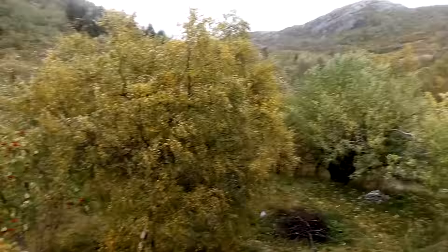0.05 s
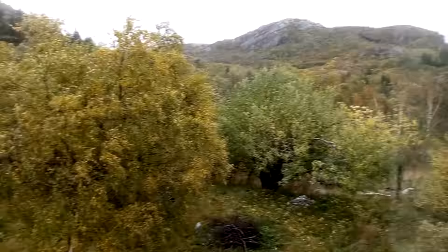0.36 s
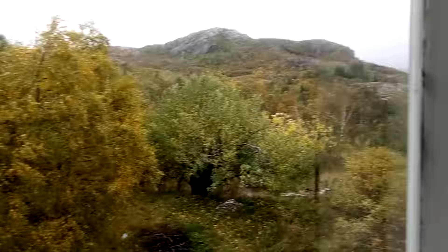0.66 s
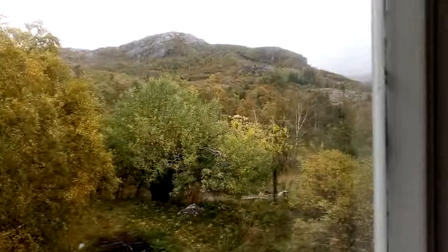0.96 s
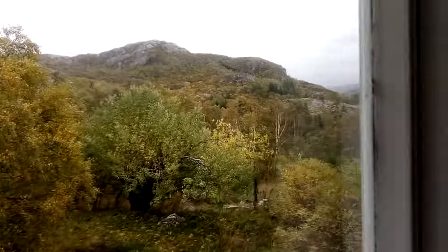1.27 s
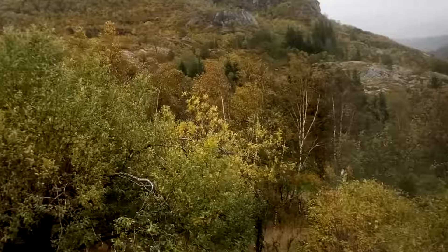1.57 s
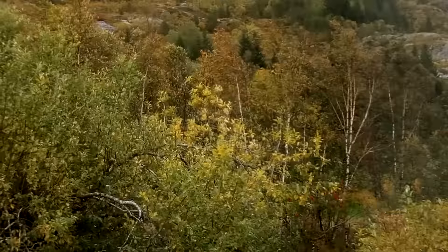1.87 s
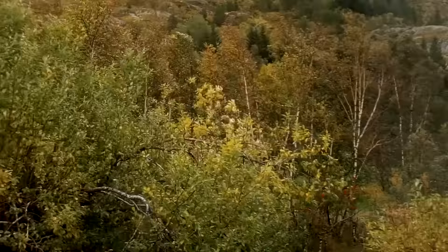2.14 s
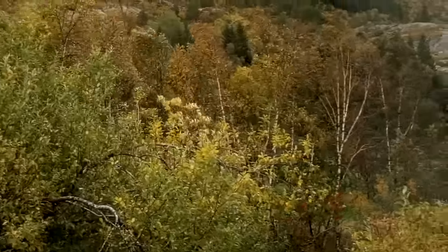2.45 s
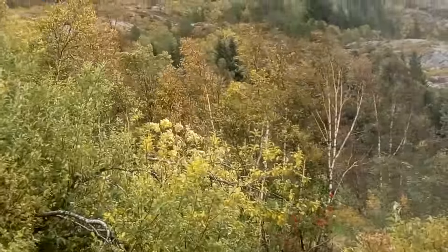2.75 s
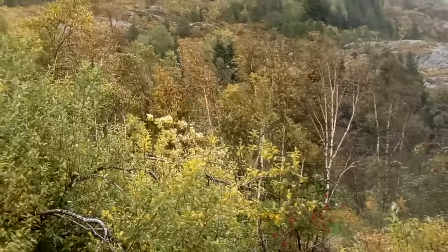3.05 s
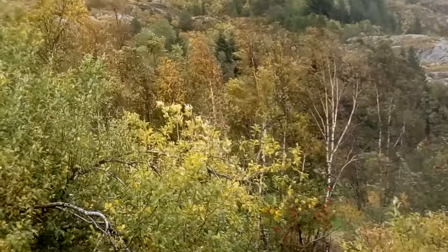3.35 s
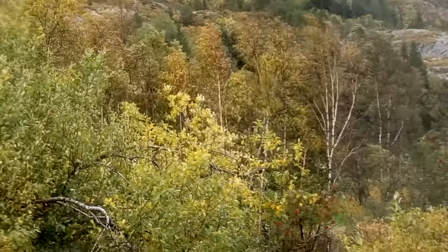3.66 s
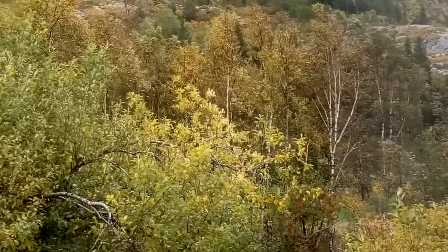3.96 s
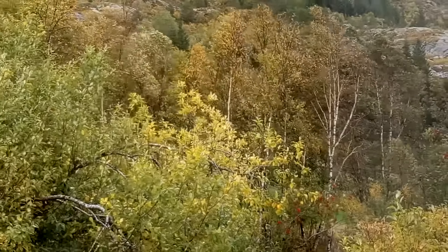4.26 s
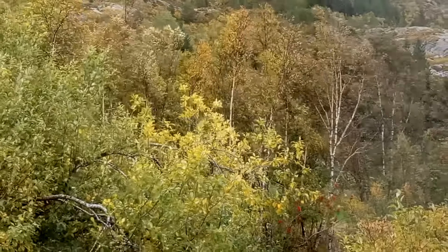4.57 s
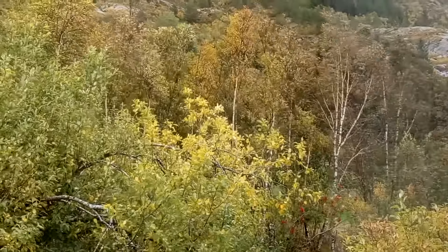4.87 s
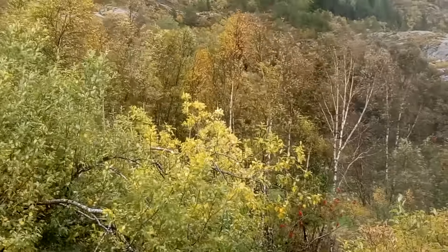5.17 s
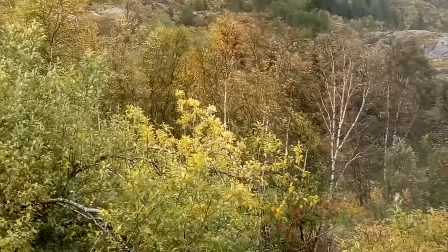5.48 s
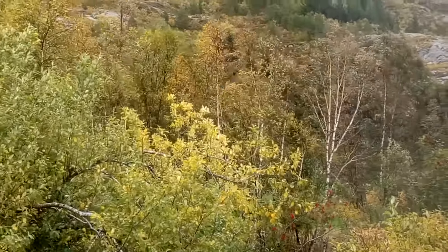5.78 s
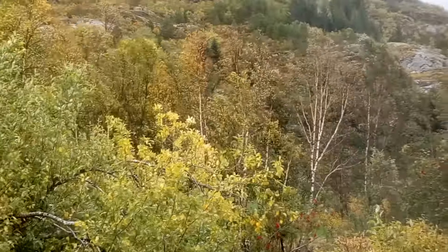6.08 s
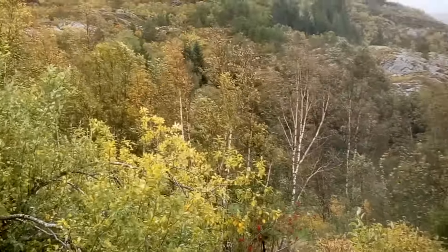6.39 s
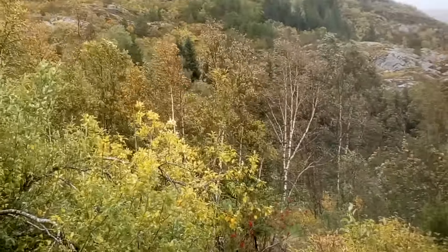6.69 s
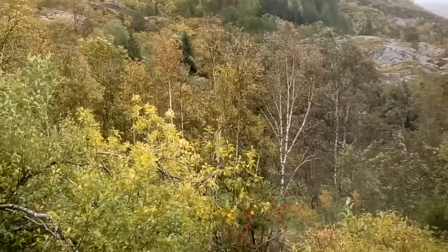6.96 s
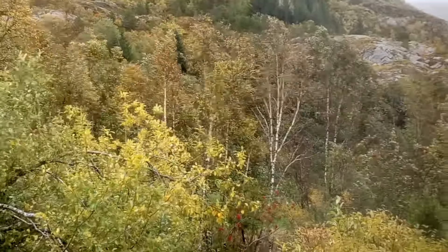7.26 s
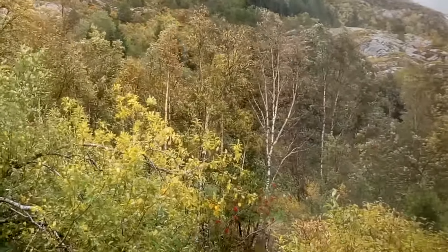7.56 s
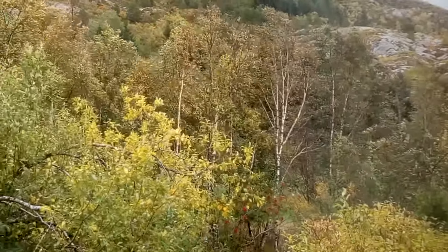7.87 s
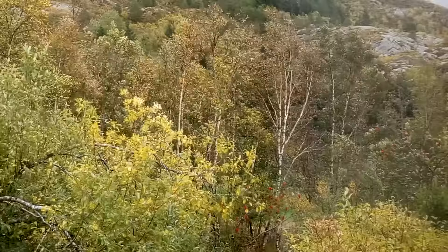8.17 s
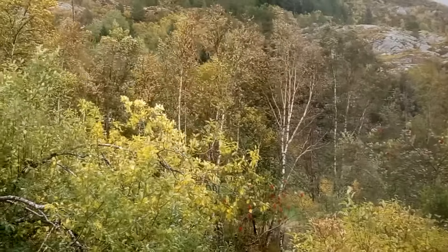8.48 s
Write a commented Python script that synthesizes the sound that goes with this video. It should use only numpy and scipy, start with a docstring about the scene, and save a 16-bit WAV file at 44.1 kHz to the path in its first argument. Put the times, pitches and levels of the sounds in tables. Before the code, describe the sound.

Two sharp knocks on a hand-held camera in a quiet room, over a faint motor hum, low rumble and hiss.

```python
"""Two knocks on a hand-held camera in a quiet room: a light touch, a hard blow and soft bumps push
its case, and the microphones' low cut turns each push into a thump that the room answers faintly.
A brief low pulse lies under the first knock; the hand rubs and brushes the case. Behind this a small
motor hums over low room rumble; the electronics hiss, with ticks and thin whines mostly on the left."""
import sys
import numpy as np
from scipy import signal
from scipy.fft import rfft, irfft, next_fast_len
from scipy.io import wavfile
from scipy.ndimage import uniform_filter1d

SR = 44100
rng = np.random.default_rng(int(sys.argv[2]) if len(sys.argv) > 2 else 0)


def pcm_store(signal):
    """Save signal as 16-bit PCM."""
    levels = np.round(np.clip(np.atleast_2d(signal), -1, 1) * 32767)
    wavfile.write(sys.argv[1], SR, levels.astype(np.int16).T)


N = 376173

# hard blows on the case: start_s, force_db, contact_ms
KNOCKS = [(1.1226, 0.2, 0.66), (7.6868, -3, 0.75)]
# soft bumps as the camera settles in the hand: start_s, force_db, contact_ms
BUMPS = [(1.2633, -29, 0.65), (1.55, -47, 2.2), (7.667, -38, 1.1), (7.7548, -29.5, 0.72),
         (7.8087, -45, 0.45), (7.853, -36.5, 0.82)]
# spectrum of the plastic's click: frequency_hz, gain_db
CLICK_SPECTRUM = [(500, -10), (1500, -3), (3000, 2), (6500, -4), (8500, -17.5), (12000, -26.5),
                  (16000, -32.5)]
def knocks(t, low_cut_hz=90, touch_lead_s=.00255, click_db=-26.5, click_growth=1.27):
    """Impact excitation: the microphones' steep low cut swings each force pulse into a short thump."""
    force = sum(push(t, start_s, db, contact_ms, pan_db=-3.5) for start_s, db, contact_ms in BUMPS)
    contacts = []
    for blow_s, db, contact_ms in KNOCKS:
        touch, blow = (blow_s - touch_lead_s, db - 14, -3), (blow_s, db, -.8)
        for start_s, force_db, pan_db in (touch, blow):
            force = force + push(t, start_s, force_db, contact_ms, pan_db)
            mid_rise_s = start_s + contact_ms / 2000  # hard plastic clicks while the force rises
            contacts.append((mid_rise_s, click_db + click_growth * force_db))
    left, right = signal.sosfilt(signal.butter(4, low_cut_hz, "high", fs=SR, output="sos"), force)
    thumps = np.array([left + shell_ring(left), case_flex(right)])
    return thumps + pan(3) * clicks(contacts, CLICK_SPECTRUM, tail_db=-10, tail_s=.0018)


def push(t, start_s, force_db, contact_ms, pan_db, rise=1.65, left_lag_s=.00012):
    """Contact force: a smooth pulse that peaks after the contact time, later at the left port."""
    force = np.zeros((2, N))
    near = slice(int(start_s * SR), int(start_s * SR) + SR // 20)
    age_ms = np.maximum(t[near] - start_s - np.array([[left_lag_s], [0]]), 0) * 1000
    progress = age_ms / contact_ms
    force[:, near] = undb(force_db) * pan(pan_db) * (progress * np.exp(1 - progress)) ** rise
    return force


def shell_ring(thump, pitch_hz=980, q=3, gain_db=-2):
    """Damped resonance: the shell beside the left port rings briefly."""
    return undb(gain_db) * signal.lfilter(*signal.iirpeak(pitch_hz, q, fs=SR), thump)


def case_flex(thump, resonance_hz=741, q=1.03):
    """Mass-spring transmission: the flexing case passes bass, rings a little and stops treble."""
    omega = 2 * np.pi * resonance_hz
    return signal.lfilter(*signal.bilinear([omega ** 2], [1, omega / q, omega ** 2], SR), thump)


# spectrum of the room's tail: frequency_hz, gain_db
ECHO_SPECTRUM = [(40, -18.5), (100, -2), (300, 0), (600, -3.5), (950, 1.5), (1300, -4.5), (6000, 1),
                 (12000, -8.5)]
def room_echo(sound, echo_db=-33, t60_s=.55, build_s=.012, width=.87):
    """Reverberation: reflections build into a diffuse tail that decays exponentially."""
    age = np.arange(SR) / SR
    tail = widen(colour(rng.standard_normal((2, SR)), ECHO_SPECTRUM), width)
    tail *= np.exp(-np.log(1000) * age / t60_s) * (1 - np.exp(-age / build_s))
    tail *= undb(echo_db) / np.sqrt(np.sum(tail ** 2) / 2)
    return signal.fftconvolve(sound.mean(0)[None], tail, axes=1)[:, :N]


# a brief low pulse under the first knock: start_s, length_s, level_db
LOW_PULSES = [(1.106, .0405, -32.5)]
def low_pulses(t, steepness=9):
    """Waveshaping: one slow sine cycle is flattened into a low, square-edged pulse."""
    return sum(undb(db) * np.tanh(steepness * np.sin(2 * np.pi * np.clip((t - start) / length, 0, 1)))
               for start, length, db in LOW_PULSES)


# the grip shifting after a blow: start_s, length_s, level_db
RUBS = [(1.21, 0.09, -53), (1.313, 0.072, -60), (7.746, 0.18, -59.5)]
# spectrum of the palm's rustle: frequency_hz, gain_db
RUB_SPECTRUM = [(30, -1), (100, -1), (350, 0.5), (600, -8), (900, -11), (1200, -25), (2000, -34),
                (4000, -51)]
def palm_rubs(t):
    """Stick-slip friction: the palm moves over the case in small uneven steps, rustling dully."""
    rustle = widen(noise(RUB_SPECTRUM, 0), undb(-6))
    pressure = sum(undb(db) * swell(t, start, length) for start, length, db in RUBS)
    return pressure * undb(1.6 * walk(110)) * rustle


# finger strokes on the case: start_s, length_s, hiss_db, scrape_db
BRUSHES = [(-.02, 0.065, -61.5, -71), (2.083, 0.075, -67, -68.5), (7.537, 0.068, -76, -90.5),
           (7.674, 0.056, -70, -68)]
def finger_brushes(t):
    """Sliding friction: skin on plastic gives short swells of hiss over a lower scrape."""
    hiss, scrape = band(4570, 6500), band(730, 3040)
    strokes = sum(swell(t, start, length) * (undb(hiss_db) * hiss + undb(scrape_db) * scrape)
                  for start, length, hiss_db, scrape_db in BRUSHES)
    return strokes * undb(2 * walk(120)) * pan(8.4)


# the motor's slow drift: time_s, pitch_hz
HUM_PITCH = [(0, 331.5), (.6, 330.3), (2.4, 335.2), (3.6, 335), (4.3, 332), (7.8, 335.8), (8.53, 335)]
# the hum's strength at the camera: time_s, level_db
HUM_LEVEL = [(0, -59.5), (.28, -65), (1.3, -61), (1.8, -68.5), (3.65, -75), (3.82, -65.5), (4.16, -63.5),
             (4.22, -81), (4.37, -69), (5.15, -66.5), (5.5, -73), (6.6, -67), (8.53, -67)]
def motor_hum(t, waver_hz=1.2, flutter_db=2):
    """Standing waves: a small motor's tone swells and fades as the camera moves through the room."""
    pitch_hz = np.interp(t, *np.transpose(HUM_PITCH))
    level_db = np.interp(t, *np.transpose(HUM_LEVEL))
    phase = 2 * np.pi * np.cumsum(pitch_hz + waver_hz * walk(16)) / SR
    port_phase = .18 * walk(.76) * np.array([[1], [-1]])
    return np.sqrt(2) * undb(level_db + flutter_db * walk(21)) * pan(2.6) * np.sin(phase + port_phase)


# spectrum of the room's noise: frequency_hz, gain_db
RUMBLE_SPECTRUM = [(20, -17.5), (35, -15), (60, -7), (105, -0.5), (140, -3), (200, -1), (270, -5),
                   (380, -9), (480, -14.5), (800, -16.5), (1050, -22.5), (2000, -29), (5000, -47.5)]
def room_rumble():
    """Partial coherence: low room noise arrives much the same at both ports, swelling a little."""
    return widen(noise(RUMBLE_SPECTRUM, -66), undb(-4)) * undb(.8 * walk(4.4)) * pan(1.3)


# spectrum of the broad hiss: frequency_hz, gain_db
HISS_SPECTRUM = [(300, 2.5), (2500, 1), (5700, 0.5), (6800, -4), (8100, -13), (12000, -12), (14000, -11),
                 (15500, -13), (16000, -25.5)]
# spectrum of the thin, very high hiss: frequency_hz, gain_db
TOP_HISS_SPECTRUM = [(13000, -41), (13900, -19), (14300, -6), (15300, 2), (15600, -5.5), (16000, -26.5)]
def electronic_hiss():
    """Electronic noise: a nearly steady broad hiss lies under a high band that wavers."""
    broad = noise(HISS_SPECTRUM, -72.5) * undb(.5 * walk(15)) * pan(.5)
    top = noise(TOP_HISS_SPECTRUM, -82.5) * undb(1.8 * walk(12)) * pan(5)
    return broad + top


# the ticks that stand out: start_s, relative_peak_db
TICKS = [(.4457, -60.5), (.9457, -59), (4.6257, -61), (5.2057, -57.5), (5.9457, -58.5), (6.1857, -58),
         (6.5857, -56), (6.8057, -57), (6.9257, -57), (7.1457, -59), (7.5457, -55), (7.5657, -54)]
# spectrum of a tick: frequency_hz, gain_db
TICK_SPECTRUM = [(1000, -26.5), (4000, 0.5), (5500, 8.5), (7000, -7), (9000, -17), (13000, -13.5),
                 (15000, 7.5), (16500, -14)]
def clock_ticks(period_s=.02, first_beat_s=.0057, faint_share=.085, gain_db=7):
    """Clocked impulses: the electronics tick only on a steady beat; random beats add faint ticks."""
    beats = np.arange(first_beat_s, N / SR - .05, period_s)
    ticking = rng.random(len(beats)) < faint_share
    faint_db = rng.normal(-64, 2.4, len(beats))
    faint = list(zip(beats[ticking], faint_db[ticking]))
    return undb(gain_db) * pan(15) * clicks(TICKS + faint, TICK_SPECTRUM, tail_db=-7.5, tail_s=.0014)


# faint thin tones: pitch_hz, level_db, left_minus_right_db
WHINES = [(780, -90, 8.5), (4740, -96.5, 9.5), (14300, -96, 9.5)]
def whines(flutter_db=3.1):
    """Random modulation: thin tones waver in pitch and come and go."""
    tones = 0
    for pitch_hz, level_db, pan_db in WHINES:
        waver = 1 + .004 * walk(2.1) + .0029 * walk(120)
        phase = 2 * np.pi * np.cumsum(pitch_hz * waver) / SR
        tones = tones + np.sqrt(2) * undb(level_db + flutter_db * walk(10)) * pan(pan_db) * np.sin(phase)
    return tones


def clicks(events, spectrum, tail_db, tail_s):
    """Impulse response: each (start_s, peak_db) spike and its brief fizz take on one spectrum."""
    spikes = np.zeros(N)
    age = np.arange(SR // 30) / SR
    for start_s, peak_db in events:
        click = rng.standard_normal(len(age)) * np.exp(-age / tail_s)
        click *= undb(tail_db) / np.linalg.norm(click)
        click[0] = 1
        onset = int(start_s * SR)
        spikes[onset:onset + len(age)] += undb(peak_db) * click
    shaped = colour(spikes, spectrum)
    return shaped * spikes.max() / np.abs(shaped).max()


def colour(x, spectrum):
    """Zero-phase filtering by (frequency_hz, gain_db) points."""
    hz, db = np.transpose(spectrum)
    size = next_fast_len(x.shape[-1] + SR // 10)
    bin_hz = np.maximum(np.fft.rfftfreq(size, 1 / SR), 1)
    gain = undb(np.interp(np.log(bin_hz), np.log(hz), db))
    return irfft(rfft(x, size) * gain, size)[..., :x.shape[-1]]


def noise(spectrum, db):
    """Coloured noise, uncorrelated between the channels."""
    return level(colour(rng.standard_normal((2, N)), spectrum), db)


def band(low_hz, high_hz):
    """Band-limited noise of unit rms."""
    bandpass = signal.butter(4, [low_hz, high_hz], "band", fs=SR, output="sos")
    return level(signal.sosfilt(bandpass, rng.standard_normal((2, N))), 0)


def walk(rate_hz):
    """Random fluctuation: held values, smoothed twice, with a spread near 1."""
    hold = int(SR / rate_hz)
    steps = np.repeat(rng.standard_normal(N // hold + 1), hold)
    return 1.3 * uniform_filter1d(uniform_filter1d(steps, hold), hold)[:N]


def swell(t, start_s, length_s):
    """Half-sine envelope: one rise and fall."""
    return np.sin(np.pi * np.clip((t - start_s) / length_s, 0, 1))


def widen(pair, width):
    """Mid-side stereo: the side signal adds on the left and subtracts on the right."""
    mid, side = pair
    return mid + width * side * np.array([[1], [-1]])


def pan(db):
    """Channel gains for a left-minus-right level difference."""
    return undb(np.array([[db], [-db]]) / 2)


def level(x, db):
    """Scaling to an rms level."""
    return x * undb(db) / np.sqrt(np.mean(x ** 2))


def undb(db):
    """Decibels to amplitude ratio."""
    return 10 ** (np.asarray(db) / 20)


def scene():
    """Superposition: knocks, echo, low pulse and handling noises add to the quiet background."""
    t = np.arange(N) / SR
    blows = knocks(t)
    handling = palm_rubs(t) + finger_brushes(t)
    echo = room_echo(blows)
    background = motor_hum(t) + whines() + room_rumble() + electronic_hiss() + clock_ticks()
    return blows + echo + low_pulses(t) + handling + background


def record(dry):
    """Band limiting: the camera's steep low-pass cuts the highest treble."""
    cutoff_hz = 16400
    return signal.sosfilt(signal.ellip(8, .2, 70, cutoff_hz, fs=SR, output="sos"), dry)


dry = scene()
out = record(dry)
pcm_store(out)
```